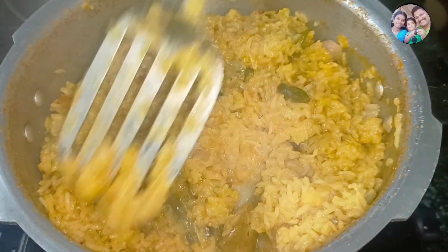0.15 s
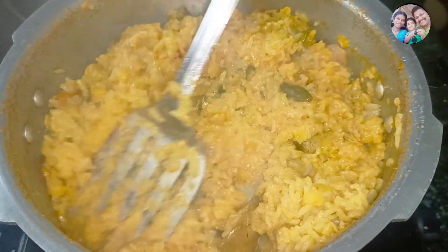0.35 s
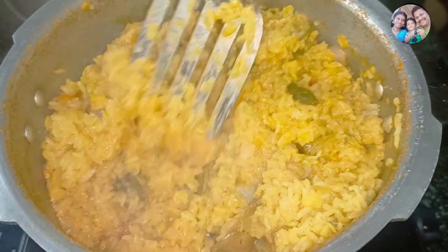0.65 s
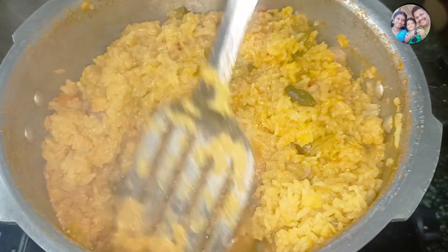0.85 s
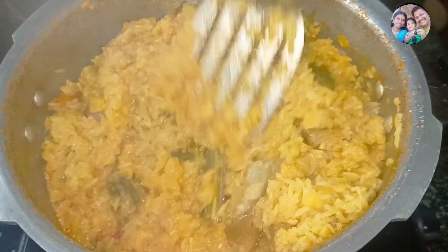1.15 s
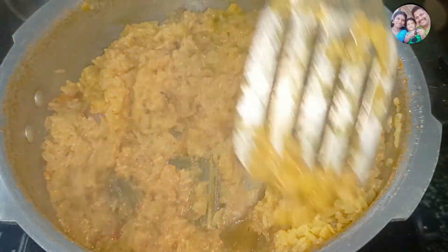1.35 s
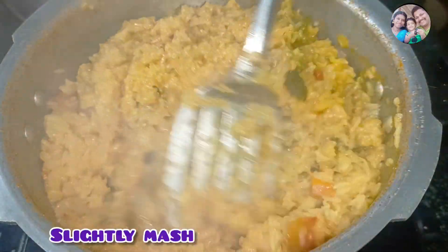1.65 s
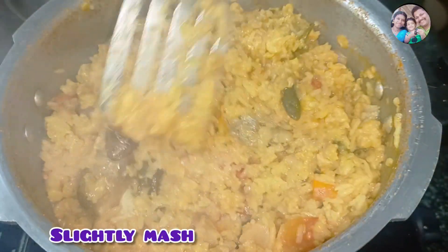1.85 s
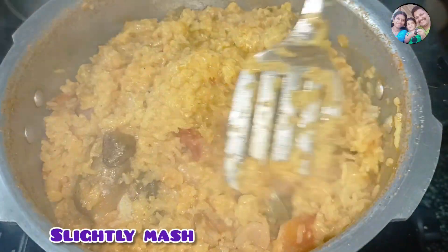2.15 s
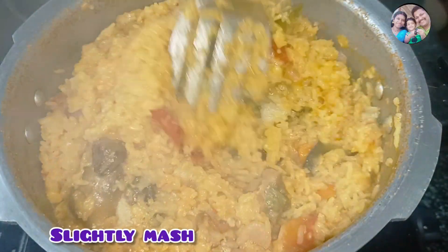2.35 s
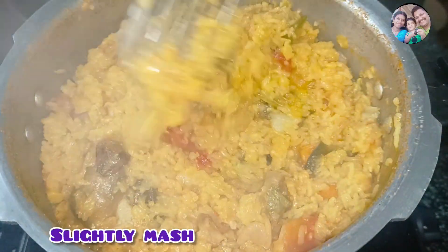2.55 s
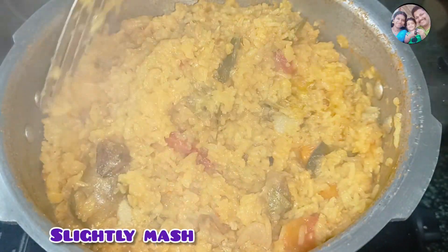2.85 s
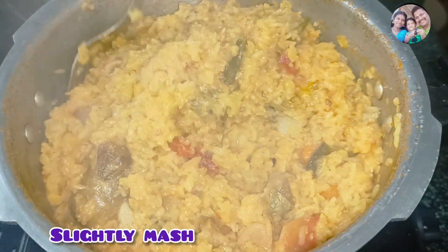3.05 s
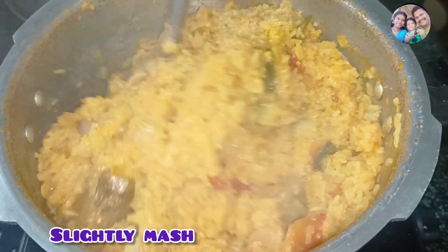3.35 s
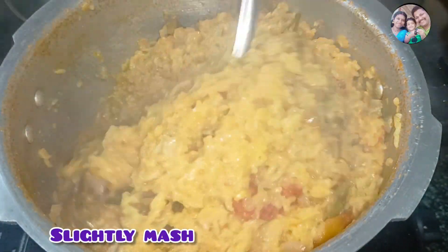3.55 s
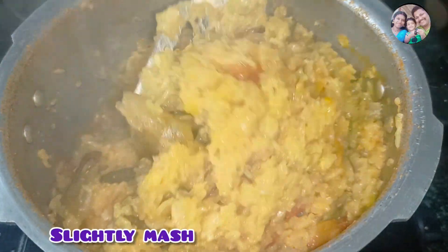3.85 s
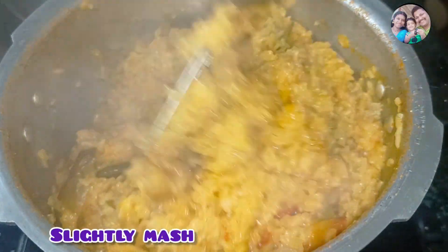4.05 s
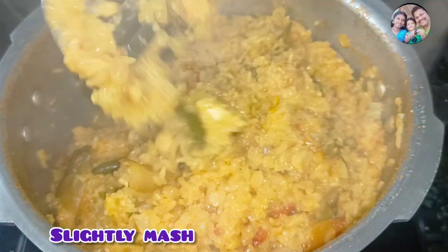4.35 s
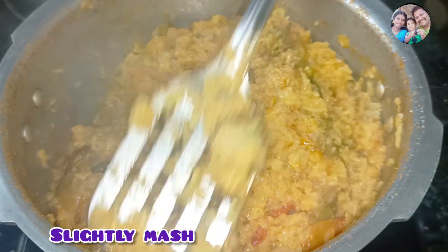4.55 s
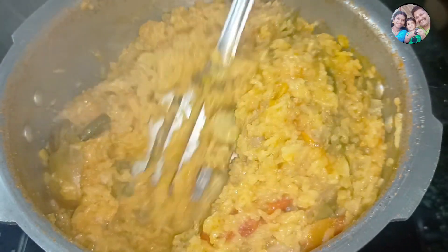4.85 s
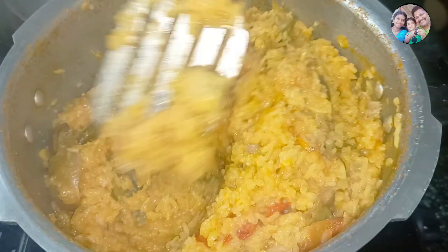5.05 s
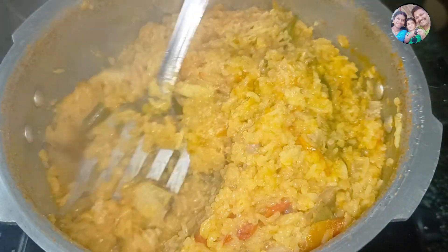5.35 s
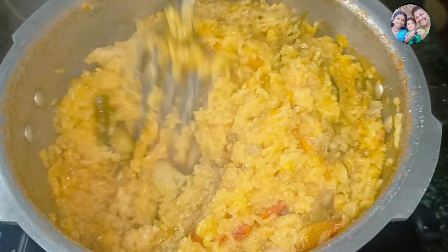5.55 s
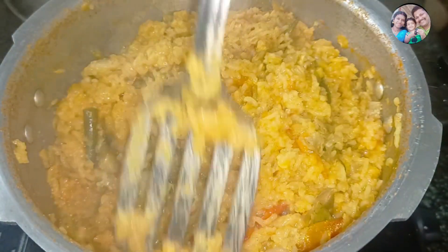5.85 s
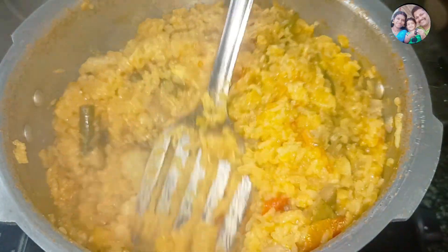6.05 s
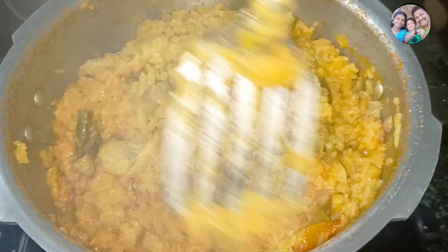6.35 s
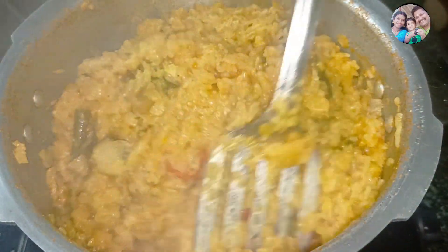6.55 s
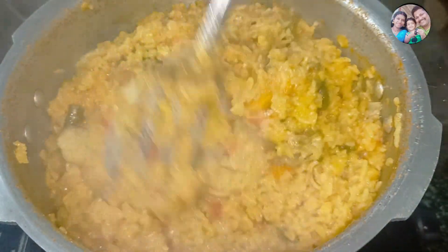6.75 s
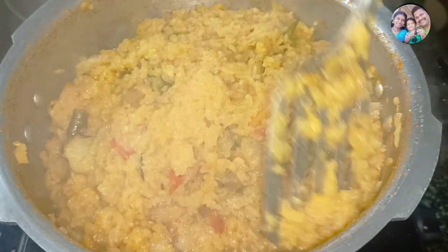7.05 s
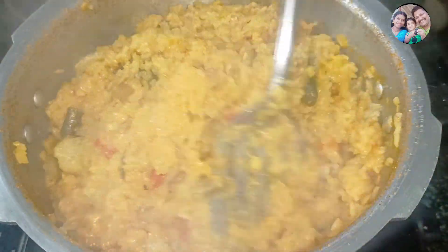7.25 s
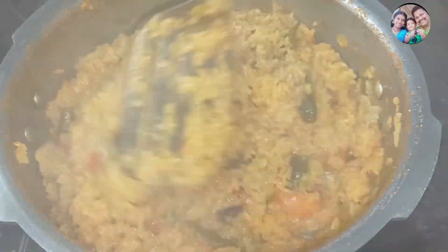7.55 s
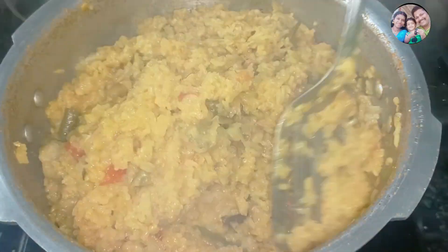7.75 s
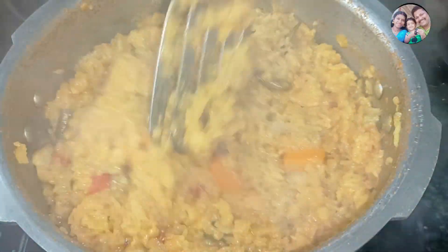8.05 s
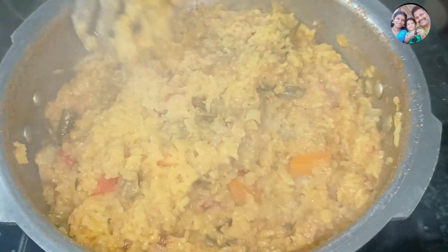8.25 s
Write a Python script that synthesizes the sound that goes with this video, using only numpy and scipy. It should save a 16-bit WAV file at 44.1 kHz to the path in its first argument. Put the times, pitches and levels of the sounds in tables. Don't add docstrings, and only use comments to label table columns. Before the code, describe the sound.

A metal turner knocks and scrapes an aluminium pot while stirring sticky wet rice, with soft crackles, small ticks and a ringing judder around three seconds.

```python
import sys
import numpy as np
from scipy import signal
from scipy.fft import rfft, irfft, next_fast_len
from scipy.io import wavfile
from scipy.ndimage import map_coordinates

SR = 44100
rng = np.random.default_rng(int(sys.argv[2]) if len(sys.argv) > 2 else 0)


def materialize(psi):
    bounded = np.clip(np.atleast_2d(psi).T, -1, 1)
    quanta = np.round(bounded * 32767).astype(np.int16)
    wavfile.write(sys.argv[1], SR, quanta)


def field_ratio(decibels):
    return 10 ** (np.asarray(decibels, dtype=float) / 20)


N = 370572

# start_s, end_s, first_force_db, last_force_db
STROKES = [(0, 0.0055, -66, -71), (0.427, .6, -53.5, -58), (0.616, 0.61, -50.5, -54.5),
           (0.85, 1.169, -69, -57), (1.34, 1.59, -78, -55), (1.61, 1.85, -62.5, -51),
           (2.111, 2.2, -60, -56), (2.243, 2.45, -63, -58), (2.455, 2.76, -69.5, -79),
           (2.808, 2.86, -67.5, -72), (3.473, 3.83, -54.5, -66.5), (3.875, 4.07, -54, -71.5),
           (4.08, 4.18, -63.5, -67.5), (4.256, 4.27, -55.5, -62), (4.8, 4.98, -61.5, -48.5),
           (5.123, 5.212, -71, -54), (5.407, 5.58, -59, -63), (5.8, 5.94, -74, -70.5),
           (5.995, 6.12, -55, -65.5), (6.146, 6.22, -59, -56.5), (6.36, 6.53, -71.5, -60),
           (6.575, 6.65, -53, -55), (6.714, 6.77, -63, -60), (6.79, 6.84, -52, -53),
           (7.096, 7.34, -61, -63.5), (7.334, 7.542, -57.5, -65.5), (7.742, 8.023, -66.5, -55),
           (8.376, 8.6, -66, -74)]
# pitch_hz, level_db (per Hz)
CRACKLE_TONE = [(710, -38.5), (1200, -23.5), (1680, -15), (2620, -4.5), (3080, -0.5), (3870, -2),
                (5590, -2.5), (6720, -3.5), (7570, 2.5), (11700, -9.5), (14700, -0.5), (16000, -32.5)]
# pitch_hz, level_db (per Hz)
SQUELCH_TONE = [(200, -27.5), (450, -4.5), (800, -7), (1500, -10), (2400, -10), (3200, -12), (4500, -34)]
# start_s, peak_db, brightest_hz
DRY_SNAPS = [(0.5901, -48, 7050), (0.6137, -34.5, 7400), (0.9425, -43.5, 7950), (1.1397, -42, 7680),
             (1.39, -43.5, 4300), (1.568, -34, 7360), (1.778, -38.5, 7000), (1.8198, -34, 7200),
             (2.114, -40.5, 3500), (2.17, -42, 7570), (2.566, -43.5, 3470), (2.819, -41.5, 7500),
             (3.483, -30.5, 7260), (3.513, -33, 5760), (3.5573, -32, 8000), (4.0917, -40, 7300),
             (4.2465, -41.5, 7850), (4.71, -36, 8000), (4.748, -37, 9000), (4.753, -39, 6500),
             (4.79, -41, 8000), (4.803, -42, 4000), (4.825, -42, 8000), (4.842, -43, 7800),
             (7.268, -48, 2900), (7.338, -44, 8300), (4.923, -33.5, 7700), (4.9658, -33, 7500),
             (5.0116, -43, 7500), (5.5516, -37, 6950), (6.57, -40, 7989), (7.0883, -42, 8000),
             (7.3592, -36, 7950), (7.38, -43, 7250), (7.9777, -39, 3580)]
# start_s, peak_db, brightest_hz
WET_PLOPS = [(1.1543, -42.5, 7650), (1.6565, -48, 7800), (2.2052, -45, 7800), (3.619, -36, 14600),
             (3.65, -42.5, 2340), (3.658, -33.5, 14100), (5.163, -44, 2450), (5.342, -31.5, 7300),
             (5.3557, -31, 7400), (5.6391, -46.5, 2670), (5.9773, -49.5, 7390), (6.0532, -41, 4270),
             (6.1642, -40, 8400), (6.1945, -33.5, 8200), (6.466, -46, 7080), (6.7055, -41.5, 10400),
             (6.7905, -40, 8420), (6.8064, -37, 7620), (7.1137, -48, 9430), (7.2888, -43, 2920),
             (7.734, -49, 4430), (7.8141, -44.5, 7420), (8.01, -42, 7540), (8.3779, -50.5, 4870)]
# start_s, peak_db, brightest_hz
GRAIN_TICKS = [(0.4474, -45, 4050), (0.5272, -40, 7780), (0.5531, -39.5, 7870), (0.913, -46, 7470),
               (1.0096, -44, 7490), (1.045, -40.5, 7800), (1.1223, -43, 7700), (1.173, -41, 7550),
               (1.5, -46, 8260), (1.5204, -45, 8190), (1.536, -40.5, 3130), (1.631, -43, 7800),
               (1.6995, -45, 7840), (1.7364, -46, 7890), (1.7983, -39, 7320), (1.8374, -38, 7770),
               (1.8594, -41, 7780), (1.8704, -40, 7630), (2.1525, -43, 7950), (2.251, -45, 2850),
               (2.359, -42, 5060), (2.4194, -45, 7540), (2.4754, -44, 7870), (3.4949, -36, 7390),
               (3.5604, -36, 7880), (3.5724, -39, 15000), (3.7145, -44, 8190), (3.7314, -48, 7910),
               (3.9154, -46, 4150), (3.9224, -48, 7300), (3.9414, -44, 3920), (5.9873, -48, 7520),
               (5.9978, -40, 7370), (6.0294, -40, 9380), (6.0871, -45, 7610), (6.1399, -45, 7540),
               (6.2487, -44, 7720), (6.4363, -49, 7700), (6.5034, -47, 2930), (6.5335, -51, 7720),
               (6.5525, -42, 8150), (6.6179, -41, 7670), (6.7321, -47, 7570), (6.8334, -38, 7740),
               (7.1761, -46, 7670), (7.2125, -48, 7350), (7.232, -52, 7630), (7.3174, -48, 7980),
               (7.407, -42.5, 5800), (7.4174, -44, 7930), (7.454, -45, 7550), (7.4804, -40.5, 8350),
               (7.7473, -49, 7770), (7.8605, -49, 7060), (7.9249, -46, 8035), (7.9523, -42, 7350),
               (7.9693, -40.5, 7760)]
# time_s, level_db
RUB_FORCE = [
    [(0.19, -26), (0.235, -29.5), (0.27, -38), (0.4, -53)],
    [(2.882, -41.5), (2.9, -43), (2.915, -38), (2.955, -38), (2.98, -45), (3.048, -55)],
    [(3.06, -32), (3.07, -43), (3.098, -34.5), (3.14, -37), (3.25, -33.5), (3.31, -35), (3.36, -33.5),
     (3.43, -41), (3.52, -62)],
    [(4.6, -31), (4.648, -40.5), (4.8, -53.5)],
    [(5.195, -55), (5.248, -47), (5.256, -41), (5.3, -46), (5.42, -59)],
]
# pitch_hz, level_db (per Hz)
RUB_TONES = [
    [(88, -63.5), (150, -15), (675, -10.5), (941, -17), (2060, -5), (3300, -5), (4670, -9), (5570, -9.5),
     (7470, -3.5), (14200, -26), (16000, -13.5)],
    [(180, -32), (300, -9.5), (645, -13.5), (713, -7.5), (1360, -7.5), (3800, 4), (5900, -0.5), (7600, 2.5),
     (9000, -3.5), (10900, -14.5), (14200, -14), (16000, -15)],
    [(88, -75), (150, -21.5), (264, -14.5), (514, -4.5), (689, -7), (805, -5.5), (1260, -9.5), (1650, -9.5),
     (2600, -12.5), (3300, -17.5), (6000, -23), (7620, -19.5), (9500, -29), (16000, -41.5)],
    [(88, -36), (150, -14.5), (235, -23), (439, -4), (624, -7), (745, -13.5), (1340, -8), (2100, -5),
     (3500, -9.5), (7620, -10), (14200, -27.5), (16000, -18)],
    [(88, -47), (150, -11), (457, -7.5), (504, -37), (649, -10.5), (1020, -14.5), (2500, -11), (7620, -13),
     (14800, -35), (16000, -27)],
]
# slips_per_s, slip_scatter_db, left_right_db, left_lag_samples, room_db,
# wall_ring (0-1)
RUB_PLACES = [
    (315, 2, 0.5, -10.5, -5, 0),
    (503.3, 2, -1, -9.5, -2.5, 0),
    (110, 2.4, -0.5, 4.5, -6.5, 0.48),
    (306, 3, 0, -5.5, -4, 0),
    (296, 1.2, -4.5, -12, -7, 0),
]
# start_s, peak_db, fade_s (time to fall 60 dB)
WALL_BLOWS = [
    (0.1832, -14.5, 0.017),
    (3.052, -25, 0.0073),
    (4.5921, -19.5, 0.022),
    (5.2503, -33, 0.05),
]
# pitch_hz, width_hz, level_db
WALL_MODES = [(564, 63, -13.5), (834, 48, 5.5), (1000, 33, -28), (1720, 33, 7.5), (2140, 44, -12.5),
              (2540, 13.8, -11.5)]
# start_s, peak_db, pitch_hz
EDGE_CATCHES = [(3.087, -22, 561), (3.094, -21.5, 975), (3.112, -18, 986), (3.122, -18, 1013),
                (3.155, -19.5, 790), (3.167, -20, 853), (3.188, -22, 616), (3.206, -18.5, 832),
                (3.219, -21.5, 798), (3.238, -19, 820), (3.268, -18.5, 800), (3.305, -27.5, 514),
                (3.343, -25, 563), (3.367, -28, 508), (3.387, -31, 660), (3.24, -26, 1630),
                (3.3, -26, 2484), (3.355, -31, 2200), (3.17, -27, 1595), (3.41, -31, 798),
                (3.435, -40, 557)]
# start_s, peak_db, pitch_hz, fade_s (time to fall 60 dB)
WALL_RINGS = [(.185, -36.5, 805, 0.12), (0.186, -38.5, 1140, 0.12), (3.052, -15.5, 1023, 0.02),
              (3.053, -24.5, 260, 0.027), (3.052, -17, 1600, 0.024), (3.053, -35, 2420, 0.017),
              (4.593, -35.5, 753, 0.27), (4.594, -40, 331, 0.36), (5.251, -41.5, 508, 0.27),
              (5.251, -37, 1008, 0.18), (5.251, -25, 3370, 0.061), (6.808, -29.5, 774, 0.012),
              (6.808, -31, 1079, 0.013), (6.808, -32, 1570, 0.011), (6.808, -32.5, 390, 0.013),
              (5.193, -39.5, 1000, .012), (5.232, -37, 1000, 0.014), (5, -40, 1200, .012),
              (3.635, -39, 1150, 0.0092), (1.345, -47, 610, 0.018), (7.97, -50.5, 132, .6),
              (3.08, -48, 95, 0.44), (7.288, -34.5, 670, 0.015), (7.289, -33, 1380, 0.011),
              (7.289, -34, 2300, 0.011), (7.289, -27, 3000, .012), (0.44, -35.5, 970, 0.016),
              (5.64, -38, 1000, 0.016)]
# time_s, pitch_hz, level_db, breathiness (0-1),
# breath_width_hz
SLOT_WHISTLES = [
    [(1.15, 2070, -80, 0.4, 119.8), (1.25, 2055, -82, .9, 180), (1.4, 2020, -84, .9, 180),
     (1.55, 2060, -83, .9, 180), (1.8, 2045, -79, .85, 180), (1.91, 2040, -78.5, .4, 121),
     (1.94, 2010, -94, .4, 120)],
    [(4.97, 1680, -73, .9, 500), (5.0, 1850, -68, .95, 800), (5.06, 1820, -70, .9, 600),
     (5.085, 1940, -66, .8, 500), (5.15, 2150, -70, .8, 500), (5.19, 2300, -69, .9, 400)],
    [(4.98, 3043, -85, 1, 400), (5.0, 2960, -72, .9, 400), (5.08, 3070, -74, 1, 400),
     (5.125, 2920, -72, 1, 400), (5.19, 2920, -73, 1, 400), (5.24, 2900, -60, 1, 400)],
    [(5.19, 4047, -70, .8, 500), (5.2, 3940, -56, .7, 500), (5.205, 3680, -42, .3, 400),
     (5.23, 3860, -44, .3, 400), (5.245, 4000, -51, .5, 400), (5.255, 3970, -90, .3, 400)],
]
# time_s, level_db
DRONE_LEVEL = [(0.0, -71), (0.14, -72), (0.21, -58.5), (0.72, -70), (1.66, -65.5), (2.88, -70),
               (3.09, -54.5), (3.53, -64.5), (4.58, -69), (4.61, -59.5), (4.98, -65), (5.33, -60),
               (5.82, -69.5), (6.03, -61.5), (7.23, -65.5), (8.07, -60.5), (8.09, -65), (8.4, -66)]
# pitch_hz, width_hz, level_db
ROOM_MODES = [(65, 5.5, -4), (92, 6.2, 0), (140.5, 5.9, -1.5), (200.2, 13, -11.5), (292.4, 14, -15)]
# peak_s, level_db, half_length_s
POT_SWELLS = [
    (1.8, -66.5, 0.072),
    (2.285, -67, 0.11),
    (7.507, -77.5, 0.33),
    (8.001, -72, 0.07),
    (8.4, -71, 0.049),
]
# time_s, level_db
HAND_LEVEL = [(0.0, -74.5), (4.35, -75), (4.72, -63), (5.45, -58.5), (5.85, -71), (7.11, -78), (7.37, -65),
              (8.4, -81)]
# pitch_hz, level_db (per Hz)
HISS_TONE = [(88, -47), (150, -4.5), (244, -6), (328, -7.5), (383, -4.5), (1140, -18.5), (3220, -18),
             (5680, -26.5), (7920, -32.5), (11300, -23.5), (14800, -26.5), (16000, -16.5)]
# pitch_hz, fade_s
ROOM_FADE = [(200, 0.46), (1000, 0.4), (4000, 0.29), (12000, .35)]
# pitch_hz, left_right_db
MIC_BALANCE = [(60, -2), (150, 0), (380, -2), (950, 1), (2380, 0), (5980, -0.5), (9000, -0.5), (12000, -5),
               (15000, -6.5)]
# pitch_hz, share (0-1)
MIDDLE_SHARE = [(100, 0.5), (250, .5), (500, 0), (5200, 0.04), (6500, .25), (9000, 0.25), (11000, 0),
                (15000, 0.02)]
# pitch_hz, level_db
BAND_LIMIT = [(15400, 2), (15900, -12), (16500, -36), (16700, -120)]

LEFT_RIGHT = np.array([[1], [-1]])


def unit(x):
    return x / np.sqrt(np.mean(x ** 2) + 1e-20)


def along(points, hz):
    f, value = np.transpose(points)
    return np.interp(np.log(hz + 1), np.log(f + 1), value)


def curves(rows):
    s, *columns = np.transpose(rows)
    return [np.interp(np.arange(N) / SR, s, column) for column in columns]


def wobble(rate):
    knots = rng.standard_normal(int(N * rate / SR) + 4)
    return map_coordinates(knots, [np.arange(N) * rate / SR])


def filtered(x, response):
    size = next_fast_len(x.shape[-1] + SR // 4)
    return irfft(rfft(x, size) * response(np.fft.rfftfreq(size, 1 / SR)), size)[..., :x.shape[-1]]


def coloured(x, tone, size=4096):
    cepstrum = irfft(np.log(field_ratio(along(tone, np.fft.rfftfreq(size, 1 / SR))) + 1e-6))
    cepstrum[1:size // 2] *= 2
    cepstrum[size // 2 + 1:] = 0
    return signal.fftconvolve(x, irfft(np.exp(rfft(cepstrum))))[:len(x)]


def resonances(modes):
    def response(f):
        total = 0
        for k, (centre, width, db) in enumerate(modes):
            total = total + (-1) ** k * field_ratio(db) * 1j * f * width / (centre ** 2 - f ** 2 + 1j * f * width)
        return total
    return response


def stirring_force():
    dig_db_per_s, settle_db_per_s, rest_db = 445, 225, -81.5
    start, end, first_db, last_db = np.transpose(STROKES)[:, :, None]
    t = np.arange(0, N / SR + .002, .002)
    progress = np.clip((t - start) / np.maximum(end - start, .002), 0, 1)
    force_db = first_db + (last_db - first_db) * progress
    force_db = force_db - dig_db_per_s * np.maximum(start - t, 0) - settle_db_per_s * np.maximum(t - end, 0)
    return np.interp(np.arange(N) / SR, t, np.maximum(force_db.max(axis=0), rest_db))


def tiny_ticks(at, hz, cycles, size):
    t = np.arange(160) / SR
    shape = size[:, None] * np.sin(2 * np.pi * hz[:, None] * t) * np.exp(-t * (hz / cycles)[:, None])
    index = at.astype(int)[:, None] + np.arange(160)
    return np.bincount(index.ravel(), shape.ravel(), N + 400)[:N]


def rice():
    force_db = stirring_force()
    draw = rng.random((5000, 3))
    pitch = np.clip(6500 * np.exp(.6 * rng.standard_normal(len(draw))), 1500, 16000)
    strength = field_ratio(-4.3 * np.log(draw[:, 2] + .06)) * pitch ** .25
    ticks = tiny_ticks(draw[:, 0] * N, pitch, 0.51 + 0.81 * draw[:, 1], strength)
    clumps = field_ratio(1.5 * wobble(30) + 2.2 * wobble(110))
    crackle = field_ratio(force_db - 3) * unit(coloured(ticks * clumps, CRACKLE_TONE))
    folding = rng.standard_normal(N) * clumps * field_ratio(3.4 * wobble(50))
    squelch_db = -71.5 + 0.75 * (force_db + 60)
    squelch = field_ratio(squelch_db) * unit(coloured(folding, SQUELCH_TONE))
    noise = rng.standard_normal((3, N))
    hiss = [unit(coloured((side + 1.1 * noise[2]) * clumps, CRACKLE_TONE)) for side in noise[:2]]
    spread = field_ratio(force_db - 8) * np.array(hiss) * field_ratio(-.7 * LEFT_RIGHT)
    return heard(crackle + squelch, pan_db=-1.9, lag=-7.5, near_db=-8, room_db=-7.5) + spread


def loose_grains():
    out, t = np.zeros((2, N + SR)), np.arange(600) / SR
    delay_s = .0005
    # table, tick level in dB, plop level against the tick in dB
    for table, gain_db, plop_db in [(DRY_SNAPS, 2, -40.5), (WET_PLOPS, 3.5, -15), (GRAIN_TICKS, 1.5, -26)]:
        for s, db, hz in table:
            draw = rng.standard_normal((3, len(t)))
            burst = draw[0] * field_ratio(-60 * t / 0.0034) * (1 - np.exp(-t / .00015))
            tone = [(hz / 5.2, -30), (hz / 1.06, 0), (hz * 1.06, 0), (hz * 5.2, -30)]
            tick = coloured(burst, tone, size=512)
            plop = coloured(draw[1] * field_ratio(-60 * t / 0.0066), SQUELCH_TONE, size=1024)
            sound = tick / np.abs(tick).max() + field_ratio(plop_db) * plop / np.abs(plop).max()
            sound *= field_ratio(db + gain_db - 1 - 2 * (hz < 5000))
            side = field_ratio(2.8 * draw[2, 0] * LEFT_RIGHT)
            out[:, round((s + delay_s) * SR):][:, :len(t)] += sound * side
    return out[:, :N]


def blade():
    out = np.zeros((2, N + SR))
    strikes, t = np.zeros(N), np.arange(SR // 20) / SR
    for s, db, fade_s in WALL_BLOWS:
        strikes[round(s * SR):][:len(t)] = field_ratio(db + 1 - 60 * t / fade_s) * (1 - np.exp(-t / 0.001))
    strikes = np.pad(strikes, (0, SR))
    for rows, tone, place in zip(RUB_FORCE, RUB_TONES, RUB_PLACES):
        rate, scatter_db, pan_db, lag, room_db, wall = place
        s, db = np.transpose(rows)
        first = round((s[0] - .012) * SR)
        t = (first + np.arange(SR)) / SR
        force = field_ratio(np.interp(t, np.r_[s[0] - .002, s, s[-1] + .03], np.r_[-110, db - 4, -110]))
        quick = 1.6 * np.tanh(wobble(rate)[:SR] / 1.8)
        slow = 0.36 * wobble(rate / 4)[:SR]
        slips = field_ratio(scatter_db * (quick + slow))
        noise = rng.standard_normal(SR)

        def shaken(x):
            return filtered(coloured(x, tone), lambda f: .5 + wall * resonances(WALL_MODES)(f))

        drive = noise * (force * unit(slips) + strikes[first:first + SR])
        scrape = shaken(drive) / np.std(shaken(noise))
        out[:, first:first + SR] += heard(scrape, pan_db, lag, -2.3, room_db)
    return out[:, :N]


def ringing_wall():
    out, t = np.zeros(N + SR), np.arange(SR // 4) / SR
    catches = [(*row, .05) for row in EDGE_CATCHES]
    for s, db, hz, fade_s in catches + list(WALL_RINGS):
        partner_hz = hz * rng.uniform(1.03, 1.15)
        ring = np.sin(2 * np.pi * hz * t) + .35 * np.sin(2 * np.pi * partner_hz * t)
        swell = field_ratio(db - 5.5 - 60 * t / fade_s) * (1 - np.exp(-t / 0.0034))
        out[round(s * SR):][:len(t)] += swell * ring
    return heard(out[:N], pan_db=4, lag=6, near_db=-4, room_db=-8.5)


def slot_whistles():
    out = np.zeros(N)
    for rows in SLOT_WHISTLES:
        first, last = rows[0], rows[-1]
        fade_in = (first[0] - .01, first[1], -140, *first[3:])
        fade_out = (last[0] + .01, last[1], -140, *last[3:])
        hz, db, breath, width = curves([fade_in, *rows, fade_out])
        breath = np.clip(breath, 0, 1)
        knots = np.cumsum(np.clip(width, 20, 900)) / SR
        flutter = [map_coordinates(part, [knots]) for part in rng.standard_normal((2, 8000))]
        sway = 1 - breath + breath * (flutter[0] + 1j * flutter[1])
        tone = np.real(sway * np.exp(2j * np.pi * np.cumsum(hz) / SR))
        out += field_ratio(db + 2.3 * wobble(40)) * tone
    return heard(out, pan_db=-2.1, lag=-5, near_db=-4, room_db=-6.5)


def kitchen():
    (drone_db,), (hand_db,), t = curves(DRONE_LEVEL), curves(HAND_LEVEL), np.arange(N) / SR
    noise = rng.standard_normal((7, N))
    drone = unit(filtered(noise[0] + 0.89 * noise[1:3], lambda f: resonances(ROOM_MODES)(f) * (f > 45)))
    swells = field_ratio(-81.5)
    for s, db, half_s in POT_SWELLS:
        swells = swells + field_ratio(db) * np.exp(-((t - s) / half_s) ** 2)
    pot_noise = unit(filtered(noise[3] + 0.44 * noise[1:3], lambda f: resonances([(332, 22, 0)])(f) ** 2))
    pot_tone = np.sin(2 * np.pi * np.cumsum(328 + 4 * wobble(6)) / SR)
    pot_hum = .7 * pot_noise + .7 * pot_tone
    hand = unit(filtered(noise[4] + 0.72 * noise[5:7], lambda f: (f > 12) / (1 + (f / 26) ** 4)))
    hiss = unit(filtered(.5 * noise[4] + noise[5:7], lambda f: field_ratio(along(HISS_TONE, f))))
    return field_ratio(drone_db) * drone + swells * pot_hum + field_ratio(hand_db) * hand + field_ratio(-70.5) * hiss


def pot_echoes(x, fade_s):
    starts, t = np.arange(0, len(x), 1024), np.arange(1024) / SR
    index = starts[:, None] + np.arange(2048)
    pieces = np.pad(x, (1024, 2048))[index] * np.sin(np.pi * np.arange(2048) / 2048)
    echoes = rng.standard_normal((2, len(starts), len(t))) * field_ratio(-60 * t / fade_s) * (t > .0003)
    echoes /= np.linalg.norm(echoes, axis=2, keepdims=True)
    answers = signal.fftconvolve(pieces[None], echoes, axes=2)
    index = (starts[:, None] + np.arange(answers.shape[2])).ravel()
    return np.array([np.bincount(index, side.ravel())[1024:][:len(x)] for side in answers])


def heard(x, pan_db, lag, near_db, room_db):
    def arrival(f):
        turn = np.pi * f * lag / SR / (1 + (f / 5600) ** 8)
        return field_ratio(pan_db / 2 * LEFT_RIGHT) * np.exp(-1j * turn * LEFT_RIGHT)

    direct = filtered(x, arrival)
    hz, t, z = signal.stft(rng.standard_normal((2, SR * 3 // 4)), SR, nperseg=256)
    fading = z * field_ratio(-60 * t / along(ROOM_FADE, hz)[:, None])
    tail = signal.istft(fading, SR, nperseg=256)[1]
    tail = np.pad(tail / np.linalg.norm(tail[0]), ((0, 0), (150, 0)))
    room = signal.fftconvolve(x[None], tail, axes=1)[:, :len(x)]
    return direct + field_ratio(near_db) * pot_echoes(x, 0.019) + field_ratio(room_db) * room


def scene():
    snaps = loose_grains()
    echoing = heard(snaps.mean(axis=0), pan_db=0, lag=-1.2, near_db=0.5, room_db=-1.45)
    grains = echoing * 0.54 + snaps * 0.09
    return rice() + grains + blade() + ringing_wall() + slot_whistles() + kitchen()


def top_cut(x):
    return signal.sosfilt(signal.butter(12, 16640, fs=SR, output="sos"), x)


def record(dry):
    middle = dry.mean(axis=0)
    narrowed = dry + filtered(middle - dry, lambda f: np.clip(along(MIDDLE_SHARE, f), 0, 1))
    mics = filtered(narrowed, lambda f: field_ratio(along(BAND_LIMIT, f) + along(MIC_BALANCE, f) / 2 * LEFT_RIGHT))
    return top_cut(mics - .0006)


dry = scene()
out = record(dry)
materialize(out)
```